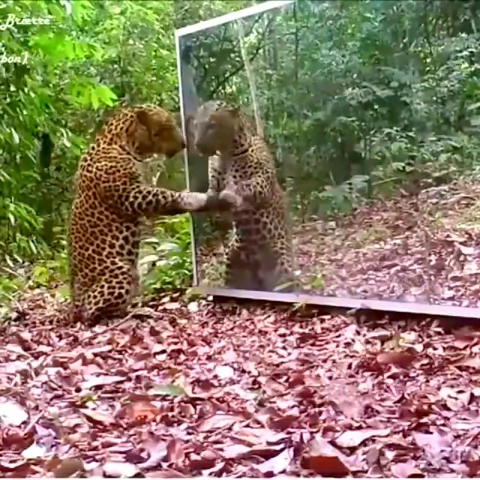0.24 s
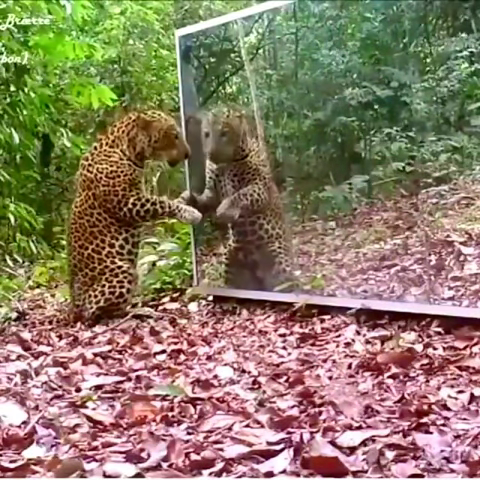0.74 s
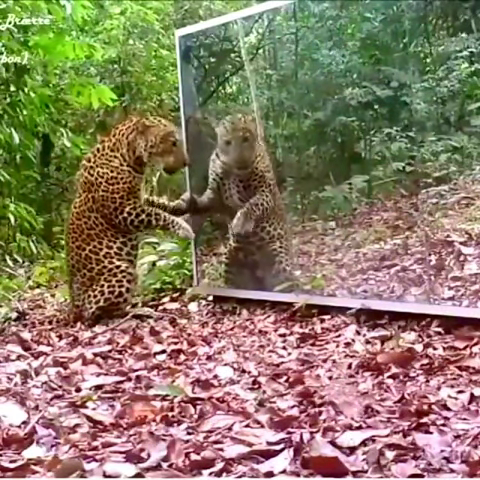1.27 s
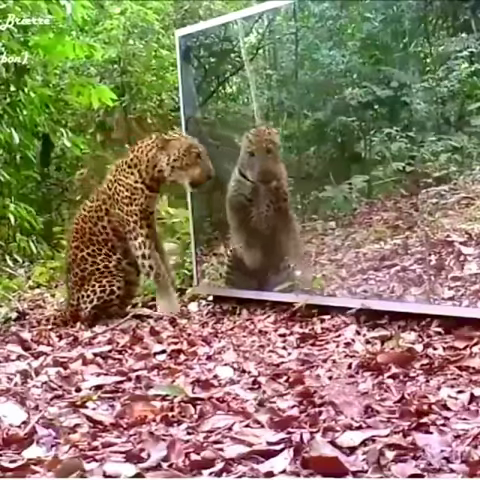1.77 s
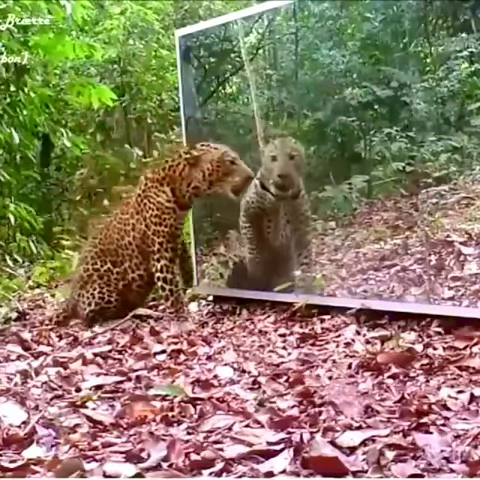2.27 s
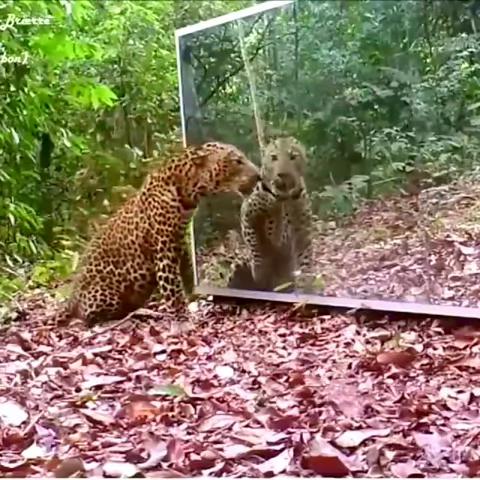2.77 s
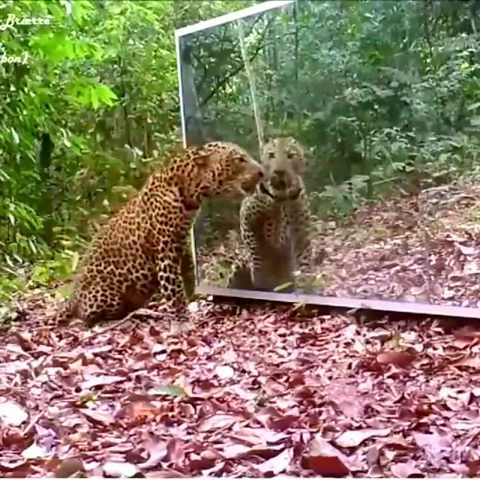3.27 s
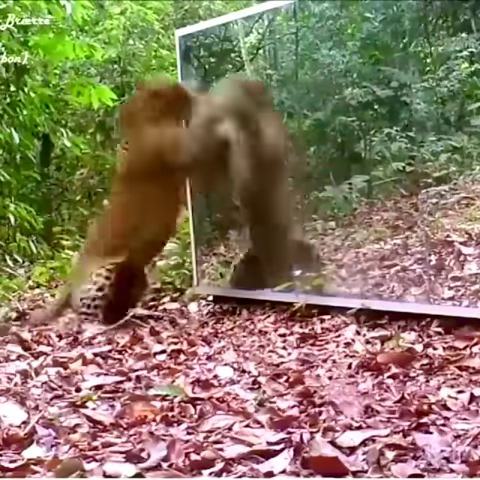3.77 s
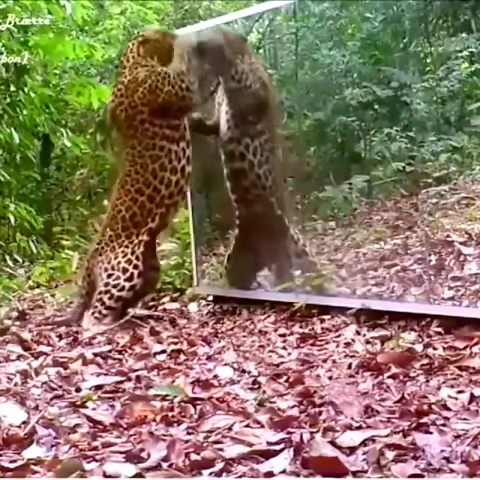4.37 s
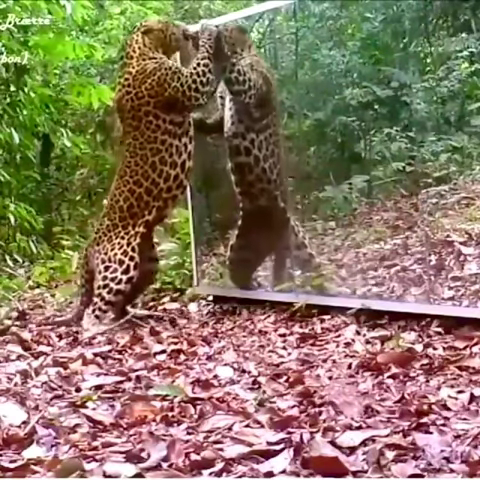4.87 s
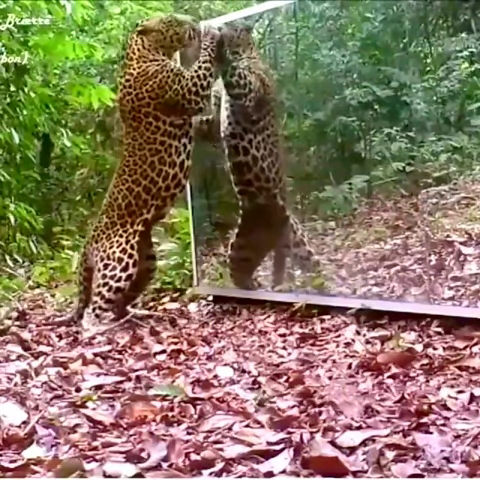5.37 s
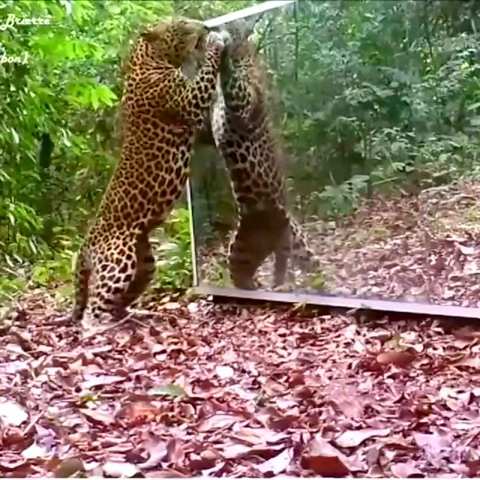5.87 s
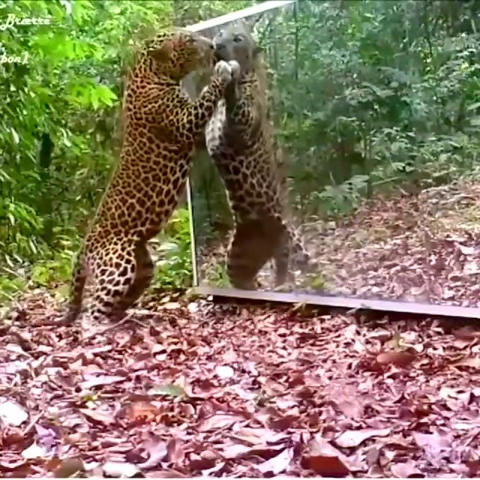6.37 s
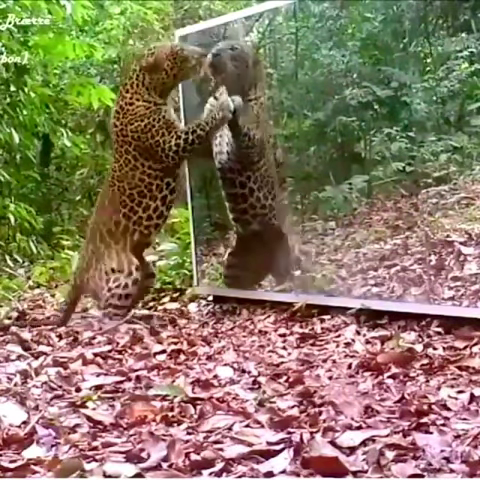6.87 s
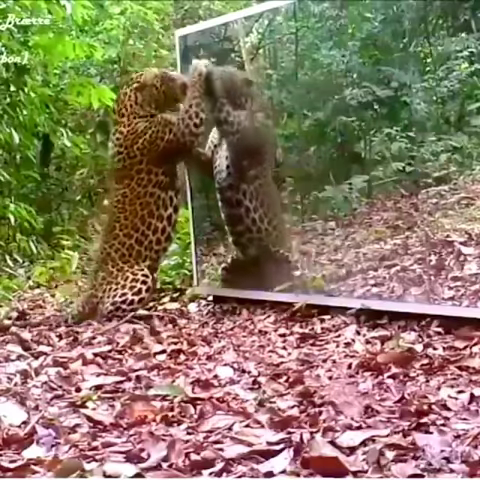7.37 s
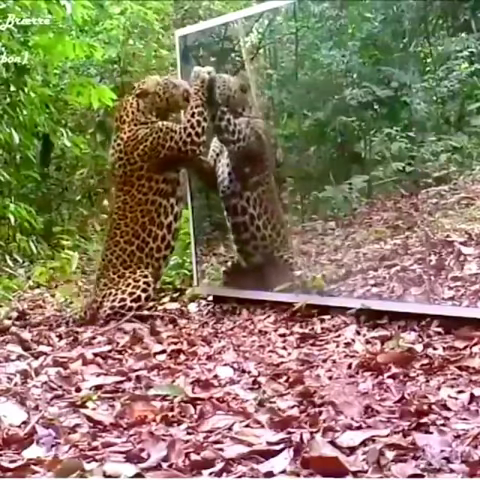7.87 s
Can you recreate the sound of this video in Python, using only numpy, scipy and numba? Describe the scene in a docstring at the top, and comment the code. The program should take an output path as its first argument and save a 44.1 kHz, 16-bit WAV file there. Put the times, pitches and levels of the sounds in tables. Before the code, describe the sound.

Close to the microphone, a large cat gives a slow, fluttering low growl, then a very loud rattling snarl about two seconds in. After a pause come short explosive snarls with hard claw clicks on glass, then quieter grumbling, a breathy rasp and one more snarl. Faint leaves, insects and a distant bird whistle lie behind, in a dull, narrow outdoor sound.

```python
"""In a forest, a big cat close to the microphone growls and snarls at a pane of glass.
Its vocal folds beat some 17 to 40 times a second; each beat, and the breath rasping past the folds, rings
the resonances of chest, throat and mouth. Claws and teeth click on the pane as short scattered modes.
Behind it, shaped noise makes the leaves and the insect bands, and a far bird whistles through the trees.
The narrow-band microphone sound clips on its loudest peaks."""
import sys
import numpy as np
from scipy import signal
from scipy.fft import rfft, irfft, next_fast_len
from scipy.io import wavfile
from scipy.ndimage import uniform_filter1d, map_coordinates
from numba import njit

SR = 44100
rng = np.random.default_rng(int(sys.argv[2]) if len(sys.argv) > 2 else 0)


def wrap_up_sound(samples):
    """Save the sound to the file named by the first command line argument, as 16-bit audio."""
    columns = np.atleast_2d(samples).T
    # keep every value between -1 and 1, then stretch to whole-number steps
    tamed = np.clip(columns, -1, 1)
    steps = np.round(tamed * 32767).astype(np.int16)
    wavfile.write(sys.argv[1], SR, steps)


N = 358265  # samples


def amp(db):
    """Gain of a level in dB."""
    return 10 ** (np.asarray(db) / 20)


def unit(x):
    """x at rms 1."""
    return x / np.sqrt(np.mean(x ** 2) + 1e-20)


def curves(rows):
    """One value per sample for each column after the time."""
    s, *cols = np.transpose(rows)
    return [np.interp(np.arange(N) / SR, s, c) for c in cols]


def wobble(rate):
    """A smooth random curve, rate knots a second."""
    knots = rng.standard_normal(int(N * rate / SR) + 4)
    return map_coordinates(knots, [np.arange(N) * rate / SR])


def filtered(x, response):
    """x times a response of frequency."""
    m = next_fast_len(N + SR // 2)
    return irfft(rfft(x, m) * response(np.fft.rfftfreq(m, 1 / SR)), m)[..., :N]


@njit
def ring(x, pole):
    """A one-mode resonator whose complex pole may move from sample to sample."""
    out, state = np.zeros(len(x)), 0j
    for i in range(len(x)):
        state = state * pole[i] + x[i]
        out[i] = state.imag
    return out


def resonance(x, hz, width_hz, skirt=4):
    """A moving resonance with steep skirts (a sharp mode, then a wider one) that keeps white noise near its power."""
    spin = np.exp(2j * np.pi * hz / SR) + np.zeros(N)
    sharp = np.exp(-np.pi * width_hz / SR)
    wide = np.exp(-np.pi * skirt * width_hz / SR)
    first = ring(x * np.sqrt(2 * (1 - sharp ** 2)), sharp * spin)
    return ring(first * 2 * (1 - wide), wide * spin)


def trees(x, t60):
    """Scattered answers of trunks and leaves: a decaying noise tail that begins after 12 ms."""
    t = np.arange(SR // 2) / SR
    tail = rng.standard_normal(len(t)) * amp(-60 * t / t60) * (t > .012)
    return signal.fftconvolve(x, tail / np.linalg.norm(tail))[:N]


# spectrum of leaves and far air: f/Hz, relative level/dB
AIR_SPECTRUM = [(20, -1), (60, 0.5), (250, -6.5), (600, -11.5), (1500, -19), (3200, -29.5), (5000, -25.5),
                (6000, -51)]
# insect bands: f/Hz, width/Hz, mean level/dB
INSECT_BANDS = [(1438, 66, -52.5), (2350, 690, -42.5), (3914, 190, -50)]


def forest():
    """Leaves and far air as shaped noise, with resonant noise bands of insects that swell and fade."""
    f, db = np.transpose(AIR_SPECTRUM)
    spectrum = lambda hz: amp(np.interp(np.log(hz + 1), np.log(f), db))
    air = unit(filtered(rng.standard_normal(N), spectrum))
    swell_db = 1.3
    insects = np.zeros(N)
    for hz, width_hz, level_db in INSECT_BANDS:
        band = resonance(rng.standard_normal(N), hz, width_hz)
        insects += amp(level_db + swell_db * wobble(4.5)) * band
    return amp(-42 + 0.96 * wobble(8.0)) * air + insects


# whistles of the far bird: t/s, level before the direct and tree paths/dB
BIRD_CHIRPS = [(0.206, -31), (5.201, -36), (7.806, -33.5)]


def bird():
    """A short rising whistle, heard direct and through the trees."""
    out, t = np.zeros(N + SR), np.arange(round(.07 * SR)) / SR
    pitch_hz = 2490 - 270 * np.exp(-t / 0.035)
    envelope = np.sin(np.pi * t / t[-1]) ** 0.083
    note = np.sin(2 * np.pi * np.cumsum(pitch_hz) / SR) * envelope
    for s, db in BIRD_CHIRPS:
        out[round(s * SR):][:len(t)] += amp(db) * note
    return 1.07 * out[:N] + trees(out[:N], t60=0.94)


# claws and teeth on the glass: t/s, relative level/dB, centre f/Hz
GLASS_CLICKS = [(1.7955, -10.5, 2540), (1.896, -10, 2950), (2.254, -14.5, 2980), (3.648, -7, 2560),
                (3.72, -1, 2770), (3.7878, -3.5, 2785), (5.2875, -10, 2580), (6.5762, -9.5, 2170),
                (6.725, -8, 2066), (7.045, -20, 4150), (7.0568, -7, 3150), (7.1393, -9.5, 3620)]
CRACK_DB = -3.5  # broad snap of the contact, relative to the modes
CLICK_T60_S, CLICK_RISE_S = 0.023, 0.00096
CLICK_SPREAD = 0.053  # scatter of the modes, log-frequency about the centre


def clicks():
    """Each click snaps and rings five short modes scattered about its centre."""
    out, t = np.zeros(N + SR), np.arange(SR // 20) / SR
    for s, db, hz in GLASS_CLICKS:
        spread, phase = rng.standard_normal((5, 1)), rng.random((5, 1))
        mode_hz = hz * np.exp(CLICK_SPREAD * spread)
        modes = np.sin(2 * np.pi * (mode_hz * t + phase)).sum(axis=0)
        crack = uniform_filter1d(rng.standard_normal(len(t)), size=5) * 2
        envelope = amp(db - 7 - 60 * t / CLICK_T60_S) * (1 - np.exp(-t / CLICK_RISE_S))
        out[round(s * SR):][:len(t)] += envelope * (modes + amp(CRACK_DB) * crack)
    return out[:N]


# vocal folds, one run per breath, even rate between rows: t/s, beats so far in the run
FOLD_BEATS = [
    [(.017, 0), (.667, 12), (1.184, 23), (1.318, 26), (1.422, 28)],
    [(1.662, 0), (1.858, 5), (2.02, 9), (2.322, 16), (2.574, 22)],
    [(2.832, 0), (2.916, 2), (3.456, 13), (3.498, 14), (3.625, 19), (3.789, 25), (3.831, 26), (3.945, 30)],
    [(3.982, 0), (4.074, 2), (4.175, 5), (4.272, 7), (4.458, 12), (4.785, 20), (5.019, 25), (5.373, 32)],
    [(5.522, 0), (5.842, 7), (6.192, 17), (6.427, 23), (6.724, 29)],
    [(6.822, 0), (7.061, 7), (7.268, 12), (7.565, 18), (7.741, 21)],
    [(7.892, 0), (7.952, 1)],
]
# beats of marked strength, mostly hard slams: t/s, extra level above the chest before rasp/dB
FOLD_SLAMS = [(0.021, 4), (1.777, 7.5), (1.81, 8.5), (1.858, 3), (2.019, 6.5), (2.068, 6), (2.104, 6),
              (2.149, 5.5), (2.189, 5), (2.273, 4), (2.868, 17), (3.112, 10.5), (3.261, 5.5), (3.311, 4.5),
              (3.527, 1.5), (3.596, 6.5), (3.624, 1), (3.678, 14.5), (3.702, 7.5), (3.728, 3.5),
              (3.762, 2.5), (3.787, 2.5), (3.83, -2.5), (3.861, 5), (3.886, 7.5), (3.914, 3.5),
              (3.944, 0.5), (4.137, 19), (4.42, 10.5), (4.458, 9), (6.15, 10.5), (6.338, 5.5), (6.521, 2.5),
              (6.568, 5.5), (6.614, 3), (6.672, 7.5), (6.71, 4.5), (7.021, 2.5), (7.227, 15), (7.268, 7),
              (7.313, 3), (7.368, 8)]


def folds():
    """Beat times and the extra strength of marked beats; each mark moves its nearest beat onto its time."""
    runs = [np.transpose(run) for run in FOLD_BEATS]
    times = np.concatenate([np.interp(np.arange(count[-1] + 1), count, s) for s, count in runs])
    extra_db = np.zeros(len(times))
    for when, db in FOLD_SLAMS:
        k = np.argmin(np.abs(times - when))
        times[k], extra_db[k] = when, db
    return times, extra_db


STEADY_LOW, STEADY_HIGH = 1, 0.21  # breath between beats: up to the palate and in the hiss / mouth to lips


def eddies(burst):
    """Breath past the folds: crackling noise with a burst after each beat, one shifted copy per cavity."""
    # loose tissue chops the air into a crackle
    flutter = amp(9.6 * np.tanh(0.53 * wobble(40) + 0.47 * wobble(220)))
    crackle = flutter * rng.standard_normal(N)

    def breath(k):
        """Eddies of cavity k, at rms 1."""
        steady = STEADY_HIGH if 4 < k < 8 else STEADY_LOW
        return unit((steady + 0.9 * burst) * np.roll(crackle, k * N // 9))
    return breath


def fold_moan(burst, chest_hz):
    """Breath noise joined by an unsteady buzz of the folds at the pitch of the chest."""
    cycles = np.cumsum(chest_hz * (1 + .055 * wobble(24))) / SR
    buzz = np.diff(np.floor(cycles), prepend=0) * amp(1.2 * wobble(30))
    noise = unit((0.7 + burst) * rng.standard_normal(N))
    return 0.84 * noise + 0.39 * unit((1.1 + burst) * buzz)


def breath_hiss(drive):
    """A broad resonance of breath and beats, thinned below so that it lives above the mouth."""
    hiss = resonance(drive, 3690, 2200, skirt=2.7)
    return filtered(hiss, lambda hz: 1 / (1 + (2200 / (hz + 1)) ** 4))


# one table per call, growl, snarl or roar: t/s, chest level/dB, level of the resonances above it/dB
CALL_LEVELS = [
    [(0, -36, -46), (.42, -33, -48), (.75, -34.5, -35), (.95, -30.5, -34.5), (1.25, -29.5, -41.5),
     (1.4, -27.5, -46.5), (1.47, -59, -74)],
    [(1.56, -39, -53), (1.64, -33, -38.5), (1.72, -22.5, -27), (1.8, -19, -24), (1.9, -8.5, -20),
     (2.0, -13.5, -21.5), (2.2, -17, -28), (2.42, -16, -27), (2.56, -12.5, -26.5), (2.62, -56, -50)],
    [(2.8, -25, -67), (2.85, -27.5, -52.5), (3.1, -29.5, -55.5), (3.3, -27, -40), (3.42, -26.5, -32)],
    [(3.46, -30, -32), (3.53, -14.5, -17), (3.59, -16.5, -23.5), (3.63, -24, -27), (3.7, -13.5, -18.5),
     (3.76, -30, -23), (3.82, -34, -28), (3.87, -20.5, -23.5), (3.93, -32, -18), (3.99, -30, -24),
     (4.04, -33.5, -40.5)],
    [(4.11, -31, -40), (4.17, -30.5, -24.5), (4.24, -38, -38.5), (4.34, -28, -27), (4.45, -28.5, -44),
     (4.52, -30.5, -36.5), (4.67, -32, -47.5), (4.76, -29, -36), (4.92, -32, -45.5), (5.36, -35.5, -51.5),
     (5.44, -36, -57)],
    [(5.52, -33, -51.5), (5.7, -39.5, -42), (6.0, -34.5, -38.5), (6.15, -40, -36.5), (6.33, -28, -31),
     (6.48, -23, -33), (6.73, -24, -38.5), (6.8, -36.5, -38.5)],
    [(6.85, -58.5, -38), (6.93, -25.5, -22), (6.99, -36, -30), (7.03, -32.5, -25), (7.09, -29, -27),
     (7.13, -29, -20.5), (7.19, -34, -36.5)],
    [(7.24, -35.5, -35.5), (7.34, -33, -44.5), (7.74, -36.5, -52), (7.92, -33.5, -51), (8.05, -62, -51)],
]
# tract poses that each call glides through:
# t/s, chest f/Hz, throat f/Hz, upper throat f/Hz, mouth f/Hz, teeth f/Hz, lips f/Hz
TRACT_POSES = [
    [(0, 134, 253, 553, 1930, 2630, 3270), (.5, 130, 293, 580, 1940, 2660, 3210),
     (.85, 131, 304, 603, 1920, 2895, 2880), (1.47, 134, 266, 554, 1830, 2660, 3130)],
    [(1.6, 150, 286, 610, 2300, 2500, 2880), (1.8, 160, 310, 589, 2096, 2640, 2910),
     (2.2, 152, 308, 633, 2077, 2490, 3190), (2.62, 144, 297, 607, 2030, 2630, 3750)],
    [(2.8, 126, 290, 537, 2190, 2640, 3600), (3.42, 129, 300, 586, 2076, 2554, 2730)],
    [(3.47, 150, 320, 634, 2090, 2480, 2830), (3.57, 168, 364, 598, 2150, 2620, 3330),
     (3.72, 151, 343.5, 650, 2060, 2560, 2850), (3.97, 135, 326, 656, 1850, 2360, 2890)],
    [(4.15, 133, 279, 577, 1880, 2660, 2710), (4.5, 123, 295, 531, 1930, 2554, 3260),
     (5.4, 128, 295, 492, 1980, 2690, 3400)],
    [(5.5, 148, 295, 646, 1854, 2365, 2800), (6.77, 134, 290, 686, 1853, 2190, 2610)],
    [(6.88, 147, 308, 636, 2170, 2630, 3330), (6.96, 147, 326, 676, 1910, 2520, 3460),
     (7.17, 149, 338, 705, 2030, 2550, 3530)],
    [(7.22, 146, 336, 682, 1920, 2570, 3430), (7.32, 133, 302, 606, 2070, 2640, 3250)],
]
# colour of the voice relative to the upper level: t/s, then level/dB of throat, upper throat, tongue,
# palate, mouth, teeth, lips, hiss
VOICE_COLOURS = [
    [(0, -9.5, -18, -3, -24, -28, 13.5, -3.5, -5), (.3, -3, -3.5, 2.5, -7, -24.5, 6, 9.5, 4.5),
     (.65, 6.5, -5, 4.5, -3, -4, -11, -8, -10.5), (1.0, 5.5, -3.5, 1, -19, -2, -5, -20, -17),
     (1.47, 2.5, -11, -8.5, 6.5, 7.5, 1, -22, -8)],
    [(1.56, -20, -17, -56, -34, 12, 14.5, -35, -17), (1.82, -7.5, -14, -13.5, -35, -0.5, -7.5, -11, -7),
     (2.15, -1.7, -7.5, -14, -11.5, 4, -7.5, -21, -5), (2.45, 2.5, -5.5, -0.5, 1.5, -5.5, -6, -0.5, -7.5)],
    [(2.8, 0.5, 1.5, -11, 1.5, 0, -8.5, -2.5, 3), (3.2, -21, -29.5, -18.5, 5, 3, 6.5, -10, -13),
     (3.42, -14.5, -27, -16, 0, 0.5, -4, -1.5, -8)],
    [(3.47, -29, -14, 4, 2.5, -2, 6, 1, 3.5), (3.56, 7.5, 3.2, -5.5, 1, -3.5, -6.5, -26.5, -5),
     (3.66, -3, -2, 3.5, 3, -7.5, -7, -27, -14), (3.72, 4, -12, 5.5, 1, -2.5, -7.5, -15, -3),
     (3.78, -1.5, -8, -3.5, -11.5, -14.5, -0.5, -7.5, -5), (3.87, 5.5, 0.5, 6.5, -14, -11, -13, -21, -15.5),
     (4.0, -10.5, -1.5, -1.5, -16, -2.5, -14, -31, -18.5)],
    [(4.09, 9.5, 5.5, 3.5, -31, 1, 6.5, -3.5, -3), (4.15, -12, -7, -1.5, -19, 3.5, -8, -14, -23),
     (4.45, -5.5, -9, -6, -19.5, -16.5, 7, -8, -12), (4.8, -19, -10.5, -5.5, -14.5, 0, 1, 2, -9)],
    [(5.52, -2, 2, -3.5, -4.5, -6, -2, -1, -3), (6.3, 0, -1, -2, -22, 2, -1, 1, -15),
     (6.8, -14, -20.5, -5.5, 4, -8, 7.5, 6, -4)],
    [(6.86, -16.5, -26.5, -14, -9, 3.5, 4.5, -1, 1), (6.95, -10.5, -6.5, -3.5, -3, 7, -2, -7.5, -13.5),
     (7.19, -17.5, -6.5, -12, -21, -3, -3, -25, -9)],
    [(7.26, -5, -4, -4.5, -6, -3, -3.5, -8, -11), (7.4, -6.5, -16, -5.5, -17, -0.5, 0, -4, -5.5)],
]
# tongue and folds: t/s, tongue f/Hz, rasp (0-1)
TONGUE_RASP = [(0, 1460, 0.06), (.5, 1250, 0.1), (.9, 1135, 0.21), (1.45, 1003, 0), (1.6, 1043, 0.28),
               (2.2, 998, 0.72), (2.62, 889, 0.56), (2.8, 930, 0.08), (3.42, 877, 0.11), (3.48, 1174, 0.6),
               (3.53, 1242, 0.49), (3.64, 977, 0.1), (3.69, 1350, 0.28), (3.8, 1273, 0.24),
               (3.95, 1160, 0.17), (4.15, 1092, 0.29), (4.5, 1030, 0.12), (5.4, 1053, 0), (5.7, 1170, 0.62),
               (5.9, 997, 0.9), (6.34, 1067, 0.9), (6.75, 1004, 0.92), (6.9, 1093, 1), (7.19, 1228, 0.18),
               (7.3, 1160, 0.7)]
# the next four list chest, throat, upper throat, tongue, palate, mouth, teeth, lips
# width before rasp and strain: width/Hz
TRACT_WIDTHS = [47, 41, 47.5, 27, 36, 75, 80, 108]
# how flat each starts after a beat, before rasp lessens it: share of its pitch
TRACT_SAG = [.001, 0.0022, 0.03, 0.049, 0.055, 0.066, 0.088, 0.1]
# how much of the rasp reaches each, before the cap: factor
TRACT_AIR = [1.26, 1.3, 1.14, 0.92, 2.1, 1.8, 2.5, 3.6]
# widening by full rasp: factor
TRACT_WIDEN = [0.75, 0.9, 1.3, 1.9, 1.5, 1, 1.6, 3.4]
PALATE_HZ = 1505
STRAIN_DB = -19.5  # upper level at which wide-open folds double the width from the tongue up


def cat():
    """Beats and beat-gated breath noise drive eight resonances of the vocal tract."""
    times, extra_db = folds()
    at = np.round(times * SR).astype(int)
    period = np.minimum(np.gradient(times), .06) * SR
    chest_db, upper_db = curves(sum(CALL_LEVELS, []))
    *upper, hiss_db = upper_db + np.array(curves(sum(VOICE_COLOURS, [])))
    tongue_hz, rasp = curves(TONGUE_RASP)
    rasp = np.clip(rasp, 0, 1)
    moving = curves(sum(TRACT_POSES, []))
    tract_hz = [*moving[:3], tongue_hz, PALATE_HZ, *moving[3:]]
    levels = [chest_db, *upper]

    now = np.arange(N) / SR
    last = np.clip(np.searchsorted(times, now) - 1, 0, None)  # the beat before each sample
    since = np.abs(now - times[last])
    # random columns for each beat: 8 colours, 8 pitch strays, size, breath burst
    chance = rng.standard_normal((len(times), 18))
    rough = rasp[at]  # rasping beats scatter more in size and colour
    size_db = (1.1 + .5 * rough) * chance[:, 16]

    # the breath bursts out after each beat and dies down
    burst_gain = amp(0.6 * extra_db + 1.5 * chance[:, 17])[last]
    burst = burst_gain * np.exp(-since / 0.014) * (1 - np.exp(-since / 0.003))
    breath = eddies(burst)
    moan = fold_moan(burst, moving[0])
    glide = np.exp(-since / 0.0035)  # the resonances start flat and glide up as the folds close
    strain = 1 + amp(upper_db - STRAIN_DB)

    voice = np.zeros(N)
    tract = zip(tract_hz, TRACT_WIDTHS, levels, TRACT_SAG, TRACT_AIR, TRACT_WIDEN)
    for k, (hz, width, db, sag, air, widen) in enumerate(tract):
        share = np.clip(air * rasp, 0, .9)
        # a hard beat cuts through the rasp, mostly from the mouth outwards
        firm = (1 - share[at]) ** np.where(extra_db > 0, .6, 2.2)
        slam_db = extra_db * (k > 0) * (1 if k > 4 else 1 - rough)
        colour_db = (1.2 + rough) * chance[:, k]
        beats = np.zeros(N)
        beats[at] = np.sqrt(period * firm) * amp(size_db + colour_db + slam_db)

        rasping = 1.03 * breath(k) + 0.52 * moan if k > 1 else moan
        drive = beats + rasping * np.sqrt(share)
        stray = (0.004 + 0.006 * rough + 0.2 * sag * rough) * chance[:, 8 + k]
        bend = 1 - sag * glide * (1 - 0.76 * rasp) + stray[last]
        width_hz = width * widen ** rasp * strain ** (k > 2)
        voice += (-1) ** k * resonance(amp(db) * drive, hz * bend, width_hz, skirt=3.44)

    # beats now holds those of the lips, the last resonance
    hiss = breath_hiss(amp(hiss_db) * (breath(8) + 0.33 * (1 - rasp) * beats))
    # a small mouth radiates no deep bass
    return filtered(voice + hiss, lambda hz: (1j * hz / 65 / (1 + 1j * hz / 65)) ** 2)


def scene():
    """The forest, the far bird, then the cat and its clicks close by with their echo among the trees."""
    background = forest() + bird()
    near = cat() + clicks()
    return (background + near + amp(-19.5) * trees(near, t60=0.25))[None]


BAND_HZ, TOP_HZ = 5500, 15690  # microphone band limit, final band limit


def record(dry):
    """A narrow-band microphone; clipping then spreads the loudest peaks up to the final band limit."""
    narrow = filtered(dry, lambda hz: 1 / (1 + (hz / BAND_HZ) ** 120))
    clipped = narrow / (1 + np.abs(narrow / .73) ** 24) ** (1 / 24)
    softened = filtered(clipped, lambda hz: 1 / (1 + (hz / 13600) ** 16))
    return filtered(softened, lambda hz: hz < TOP_HZ)


dry = scene()
out = record(dry)
wrap_up_sound(out)
```